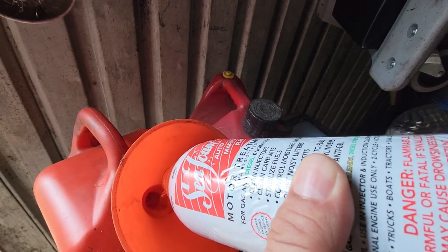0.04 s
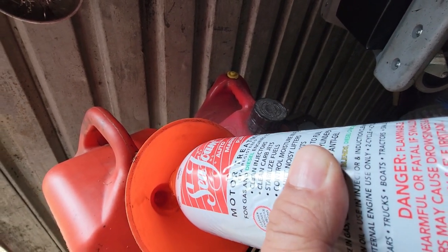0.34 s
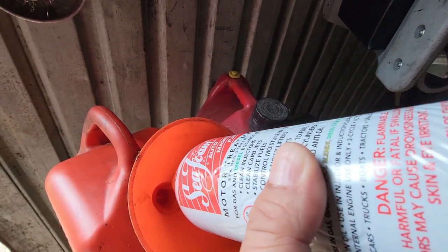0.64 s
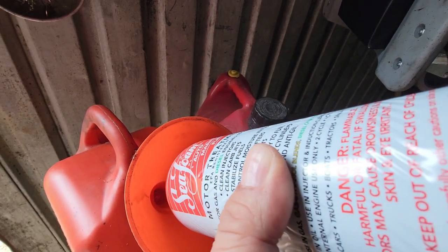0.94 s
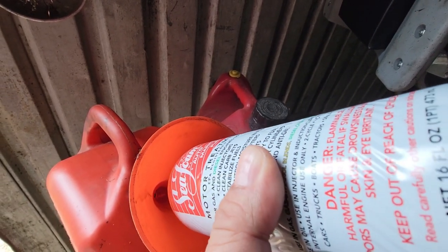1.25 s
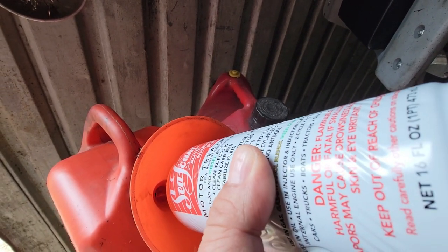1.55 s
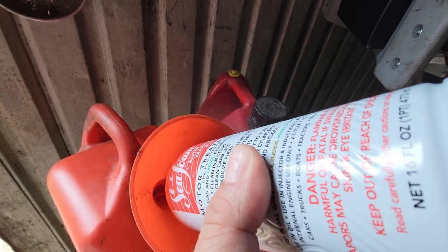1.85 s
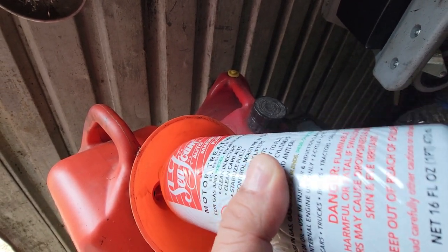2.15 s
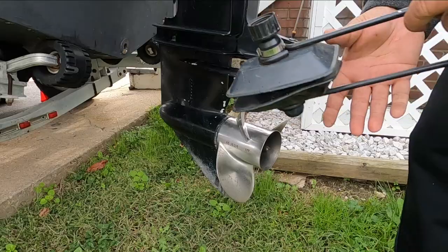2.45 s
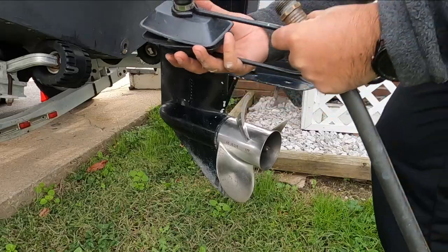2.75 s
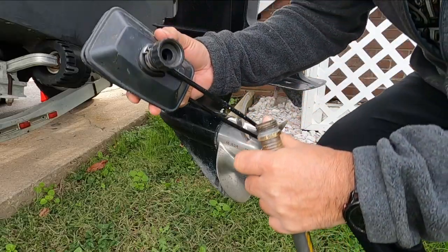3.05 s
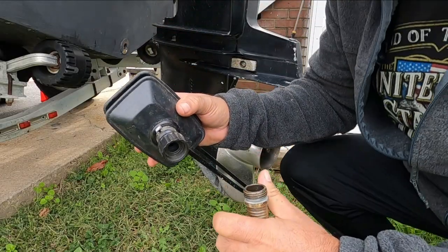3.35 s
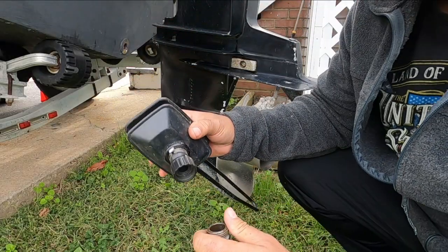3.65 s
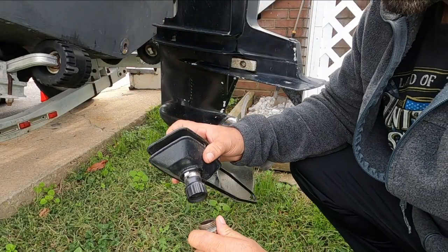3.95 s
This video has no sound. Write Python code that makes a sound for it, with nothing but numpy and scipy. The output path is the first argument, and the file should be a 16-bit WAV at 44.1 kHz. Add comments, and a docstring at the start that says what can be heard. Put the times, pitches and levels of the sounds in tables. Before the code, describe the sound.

Liquid trickles softly through a funnel into a hollow fuel can, dripping and gurgling over a low rumble until about 1.6 seconds. From 2 seconds a tin taps and scrapes the plastic funnel, with two small pings and hollow knocks. Sound cuts out near 2.5. From 2.7 louder outdoor wind rumbles and a sleeve swishes; from 3 to 3.8 a distant drone wavers, with cloth rubbing and faint wire scraping.

```python
"""In a shed, liquid trickles from a tin through a plastic funnel into a fuel can; bubbles and drips
ring the hollow can over a low rumble. The flow dies. The tin taps the funnel and scrapes along it,
its rim pings and the funnel knocks in the can's neck. The shed stops dead. After a short silence,
outdoors: wind rumbles, a sleeve swishes, something drones far off and a wire clamp scrapes faintly."""
import sys
import numpy as np
from scipy import signal
from scipy.fft import rfft, irfft
from scipy.io import wavfile
from scipy.ndimage import uniform_filter1d

SR = 44100
rng = np.random.default_rng(int(sys.argv[2]) if len(sys.argv) > 2 else 0)


def put_to_file(sound):
    """Save the sound as 16-bit audio at rate SR, in the file named by the first command-line argument."""
    columns = np.atleast_2d(sound).T  # one column per channel
    safe = np.clip(columns, -1, 1)
    whole_steps = np.round(safe * 32767)
    wavfile.write(sys.argv[1], SR, whole_steps.astype(np.int16))


N = 176400
TIME_S = np.arange(N) / SR
RING_S = TIME_S[:SR // 4]  # time axis of one short event


# stream flow: time_s, gain_db
FLOW = [(0, 4), (.14, 0), (.22, -9.5), (.44, -1), (.59, -14.5), (1.0, -6.5), (1.22, -10), (1.49, -8.5),
        (1.56, -20)]
# patter spectrum: freq_hz, gain_db
PATTER_SPECTRUM = [(300, -0.5), (2000, -4), (3200, -7), (4400, 3), (5600, -8), (7200, -0.5), (8400, -22.5),
                   (15000, -17)]
IMPACTS_PER_S, PATTER_DB = 350, -50.5

def trickle():
    """A thin, spurting stream patters into the can, louder where drips throw up spray."""
    patter = in_can(colour(clicks(IMPACTS_PER_S, spread_db=3), PATTER_SPECTRUM))
    flow = curve(FLOW) * undb(PATTER_DB) * uneven(per_s=35, depth_db=7)
    return patter * (flow + spray())


# air modes of the can: freq_hz, gain_db, t60_s
CAN_MODES = [(942, -8, 0.07), (2126, 2, 0.11), (2660, 1, 0.065), (3790, 1, 0.068), (4277, -4.5, .045),
             (6770, -11, 0.035)]
CAN_T60_S = 0.12

def in_can(x):
    """The hollow can adds dense wall echoes and air modes to the direct sound."""
    response = undb(7) * burst(CAN_T60_S) + unit(modes(CAN_MODES))
    response[:, 0] += undb(-6) * np.sqrt(len(RING_S))  # direct path
    return unit(signal.fftconvolve(x[None], response, axes=1)[:, :N])


# drips and bursting bubbles: start_s, pitch_hz, level_db, t60_s, splash_share
DRIPS = [(.044, 2122, -43, 0.14, 0.05), (.043, 6760, -53.5, 0.06, 0.3), (0.107, 4240, -56, 0.028, 0.66),
         (0.292, 4180, -45, 0.11, 0.7), (0.297, 2677, -47.5, 0.14, 0.21), (.360, 2014, -56, 0.05, 0.9),
         (0.389, 6980, -52.5, 0.05, 0.5), (0.489, 2584, -46, 0.055, 0.85), (.526, 4070, -56, 0.032, 0.6),
         (.648, 4396, -48, 0.087, 0.4), (.712, 3410, -51, 0.23, 0.95), (1.137, 4300, -54, 0.028, 0.7),
         (1.170, 7430, -54.5, 0.031, 0.06), (1.181, 4380, -47, 0.037, 0.2), (1.274, 2900, -48.5, .05, 0.7),
         (1.278, 3880, -49.5, 0.087, 0.07), (1.311, 2116, -49, 0.059, 0.6), (1.378, 4620, -51, 0.043, 0.5),
         (1.468, 7140, -55, 0.035, 0.3), (1.736, 6950, -57, 0.086, 0.7)]

def drips():
    """Drips and small bubbles ring high in the can."""
    out = np.zeros((2, N))
    for start_s, pitch_hz, level_db, t60_s, splash_share in DRIPS:
        add(out, start_s, bubble(pitch_hz, t60_s, splash_share), level_db)
    return out


def spray():
    """Patter gain from the brief spray of droplets after each drip."""
    gain = np.zeros((1, N))
    for start_s, _, level_db, _, _ in DRIPS:
        add(gain, start_s, decay(t60_s=.25)[None], level_db - 9)
    return gain


# large bubbles: start_s, level_db, pitch_hz
GURGLES = [(.026, -51.5, 920), (.312, -47.5, 907), (.531, -49, 725), (.609, -50, 908), (.688, -52.5, 1158),
           (.863, -49, 876), (.886, -53, 830), (.953, -58, 840), (.994, -52, 830), (1.216, -54, 753),
           (1.403, -55, 873)]

def gurgles():
    """Larger bubbles ring lower, in the funnel's neck."""
    out = np.zeros((2, N))
    for start_s, level_db, pitch_hz in GURGLES:
        add(out, start_s, bubble(pitch_hz, t60_s=0.053, splash_share=0.055), level_db)
    return out


def bubble(pitch_hz, t60_s, splash_share, rise=0.032, attack_s=0.0026, echo_db=4):
    """A tone that rises as it dies, with a splash around its pitch and echoes off the can's walls."""
    glide = 1 + rise * (np.minimum(RING_S / t60_s, 1) - .2)
    tone = np.sin(2 * np.pi * pitch_hz * np.cumsum(glide) / SR)
    band_hz = [pitch_hz / 1.09, min(pitch_hz * 1.067, 7900)]
    bandpass = signal.butter(2, band_hz, "band", fs=SR, output="sos")
    splash = unit(signal.sosfilt(bandpass, rng.standard_normal(len(RING_S))))
    envelope = decay(t60_s) * (1 - np.exp(-RING_S / attack_s))
    pop = (np.sqrt(1 - splash_share) * tone + np.sqrt(splash_share) * splash) * envelope
    walls = burst(CAN_T60_S) * undb(echo_db) / np.sqrt(len(RING_S))
    walls[:, 0] += 1  # direct path
    return signal.fftconvolve(pop[None], walls, axes=1)


# splash envelope: time_s, level_db
SPLASH_LEVEL = [(0, -61), (.4, -51), (.5, -63), (.62, -94.5)]
# splash resonance: freq_hz, width_hz, gain_db
SPLASH_PEAK = [(1770, 590, 0)]

def wall_splash():
    """At first the full stream splashes on the funnel's wall."""
    impacts = clicks(IMPACTS_PER_S, spread_db=3)
    return in_can(resonate(impacts, SPLASH_PEAK)) * curve(SPLASH_LEVEL)


# burble envelope: time_s, level_db
BURBLE_LEVEL = [(.25, -64.5), (.9, -57), (1.48, -61.5), (1.6, -77)]
# funnel neck resonances: freq_hz, width_hz, gain_db
NECK_PEAKS = [(754, 68, 1), (901, 58, 0.5), (1198, 33, 1)]

def burble(t60_s=.02):
    """The stream excites the hollow neck of the funnel."""
    impacts = clicks(IMPACTS_PER_S, spread_db=0.95)
    echoes = burst(t60_s) + burst(t60_s)[:1]
    churn = signal.fftconvolve(impacts[None], echoes, axes=1)[:, :N]
    return unit(resonate(churn, NECK_PEAKS)) * curve(BURBLE_LEVEL)


# fine spatters: start_s, level_db, centre_hz
SPATTERS = [(0.530, -61, 6240), (.660, -67, 7200), (.860, -61, 6000), (0.931, -57.5, 7760),
            (1.03, -59, 5000), (1.285, -60, 12000), (1.745, -62.5, 12600), (2.168, -61, 8000),
            (2.188, -60, 8670), (2.222, -56.5, 5550), (2.309, -59, 12500), (2.358, -52, 7400),
            (2.439, -62, 7100)]

def spatter(width_share=0.29):
    """Tiny droplets land in sharp, grainy bursts."""
    out = np.zeros((2, N))
    for start_s, level_db, centre_hz in SPATTERS:
        droplets = burst(t60_s=0.16) * np.abs(rng.standard_normal(len(RING_S)))
        add(out, start_s, resonate(droplets, [(centre_hz, centre_hz * width_share, 0)]), level_db)
    return out


# first touch of the tin: start_s, level_db
TAPS = [(1.985, -48.5)]
# sliding pressure: time_s, gain_db
PRESSURE = [(2.02, -22.5), (2.045, -9.5), (2.12, -9.5), (2.2, -2.5), (2.27, 1.5), (2.365, -1), (2.385, -20)]
# scrape resonances: freq_hz, width_hz, gain_db
SCRAPE_PEAKS = [(1888, 162, 8), (2400, 690, -4), (3450, 210, -9.5), (4300, 470, -10.5), (7150, 790, -22.5)]
# broad rasp of the scrape: freq_hz, gain_db
RASP_SPECTRUM = [(200, 15.5), (600, 4.5), (4000, -21.5), (15000, -47)]
SCRAPE_DB, RASP_GAIN_DB = -44.5, -8.5

def tin_scrape():
    """The tin taps the funnel, then sticks and slips along it."""
    common, left, right = (clicks(per_s=3000, spread_db=1) for _ in range(3))
    slips = common + .5 * np.array([left, right])
    scrape = unit(resonate(slips, SCRAPE_PEAKS)) + undb(RASP_GAIN_DB) * unit(colour(slips, RASP_SPECTRUM))
    grip = curve(PRESSURE) * uneven(per_s=35, depth_db=4)
    touching = TIME_S > TAPS[0][0]
    out = scrape * grip * touching * undb(SCRAPE_DB)
    for start_s, level_db in TAPS:
        tap = colour(burst(t60_s=0.054), [(300, 7), (2900, 6), (3600, -35)])
        add(out, start_s, tap, level_db)
    return out


# rim pings: start_s, pitch_hz, level_db, t60_s
PINGS = [(2.309, 4470, -42.5, 0.08), (2.384, 3824, -45, 0.14)]

def rim_pings():
    """The tin's rim rings in one mode, with a shorter noise at the same pitch."""
    out = np.zeros((2, N))
    for start_s, pitch_hz, level_db, t60_s in PINGS:
        ring = unit(modes([(pitch_hz, 0, t60_s)])[:1])
        strike = unit(resonate(burst(t60_s / 2), [(pitch_hz, pitch_hz / 10, 0)]))
        add(out, start_s, ring + strike, level_db)
    return out


# funnel knocks: start_s, level_db
KNOCKS = [(2.224, -47), (2.234, -39.5), (2.392, -34)]
# plastic funnel modes: freq_hz, gain_db, t60_s
FUNNEL_MODES = [(178, -13, 0.2), (343, 0.5, 0.078), (510, -7, 0.041), (736, -3.5, 0.032),
                (1031, -11.5, 0.069)]

def funnel_knocks(crack_db=-9.5, push_s=.008):
    """The funnel hits the can's neck: low modes and a noisy crack."""
    out = np.zeros((2, N))
    attack = 1 - decay(push_s)
    for start_s, level_db in KNOCKS:
        crack = colour(burst(t60_s=0.24), [(300, -5), (1000, 3), (1600, -11), (15000, -32)])
        body = unit(modes(FUNNEL_MODES)[:1] + .5 * modes(FUNNEL_MODES))
        add(out, start_s, (body + undb(crack_db) * unit(crack)) * attack, level_db)
    return out


# swish envelope: time_s, level_db
SWISH_LEVEL = [(2.66, -44), (2.81, -34.5), (2.835, -35.5), (2.86, -48), (2.93, -60), (3.05, -66)]
# swish spectrum: freq_hz, gain_db
SWISH_SPECTRUM = [(400, -20), (1100, 2.5), (2300, 6), (3200, -1.5), (7000, -13.5), (8500, -22),
                  (14500, -41)]
# rub envelope: time_s, level_db
RUB_LEVEL = [(2.8, -50), (3.3, -54.5), (3.42, -51), (3.65, -50.5), (3.8, -62.5)]
# rub spectrum: freq_hz, gain_db
RUB_SPECTRUM = [(1200, 15), (2500, 0.5), (5500, 0), (8500, -14), (10500, -14.5), (15000, -41)]

def sleeve():
    """Cloth swishes once, then rubs softly."""
    return noise(SWISH_SPECTRUM) * curve(SWISH_LEVEL) + noise(RUB_SPECTRUM) * curve(RUB_LEVEL)


# clamp envelope: time_s, level_db
CLAMP_LEVEL = [(3.25, -76), (3.42, -62.5), (3.66, -69), (3.72, -85)]
# clamp resonance: freq_hz, width_hz, gain_db
CLAMP_PEAK = [(2520, 100, 0)]

def wire_clamp():
    """A handled wire clamp scrapes: small slips excite one thin resonance."""
    slips = clicks(per_s=350, spread_db=3.6)
    return unit(resonate(slips, CLAMP_PEAK)) * curve(CLAMP_LEVEL)


# drone envelope: time_s, level_db
DRONE_LEVEL = [(3.04, -63), (3.14, -40.5), (3.24, -47), (3.3, -56), (3.43, -40), (3.5, -51.5),
               (3.57, -43.5), (3.76, -47), (3.84, -54)]
# drone resonances: freq_hz, width_hz, gain_db
DRONE_PEAKS = [(515, 63, -3.5), (757, 69, -8), (1000, 54, -16.5), (1350, 110, -21)]

def far_drone():
    """Narrow bands of noise swell and sink in the distance."""
    return unit(resonate(rng.standard_normal(N), DRONE_PEAKS)) * curve(DRONE_LEVEL)


# wind envelope: time_s, level_db
WIND_LEVEL = [(2.66, -30.5), (3.35, -31.5), (3.55, -35.5), (4, -35)]
# wind spectrum: freq_hz, gain_db
WIND_SPECTRUM = [(27, -7), (36, -1), (65, -8), (110, -5.5), (150, -14.5), (220, -17.5), (280, -23.5),
                 (1000, -36.5), (3000, -73)]
# low wind resonances: freq_hz, width_hz, gain_db
THRUM_PEAKS = [(96.2, 9, -2), (117.2, 8.1, -5)]

def wind(thrum_db=-2.5):
    """Wind rumbles and thrums, easing near the end."""
    rumble = noise(WIND_SPECTRUM)
    thrum = unit(resonate(rng.standard_normal(N), THRUM_PEAKS))
    return (rumble + undb(thrum_db) * thrum) * curve(WIND_LEVEL)


# outdoor air: freq_hz, gain_db
YARD_SPECTRUM = [(300, -1.5), (1100, 6), (2300, -17.5), (7000, -70), (8500, -44), (14000, -59)]

def yard_air(level_db=-51):
    """Steady midrange hush outdoors."""
    return noise(YARD_SPECTRUM) * undb(level_db)


# shed rumble: freq_hz, gain_db
RUMBLE_SPECTRUM = [(25, -18), (55, 1), (78, 0), (110, -9), (300, -21), (700, -37.5)]
# shed air: freq_hz, gain_db
AIR_SPECTRUM = [(300, 0), (800, 4.5), (1400, -1), (4000, -10), (7000, -15), (8500, -33.5), (15000, -32.5)]
RUMBLE_DB, AIR_DB, RIGHT_LAG_S = -47.5, -63.5, 0.00049

def shed_air():
    """Low rumble that arrives slightly later on the right, and faint, wide air."""
    low = noise(RUMBLE_SPECTRUM)
    delayed = np.roll(low, int(RIGHT_LAG_S * SR))
    rumble = np.array([low * undb(RUMBLE_DB - .5), delayed * undb(RUMBLE_DB + .5)])
    mid = noise(AIR_SPECTRUM)
    side = undb(4.5) * noise(AIR_SPECTRUM)
    return rumble + np.array([mid + side, mid - side]) * undb(AIR_DB)


def undb(db):
    return 10 ** (np.asarray(db) / 20)


def unit(x):
    """Scale to unit RMS."""
    return x / np.sqrt(np.mean(x ** 2) + 1e-20)


def curve(points):
    """Gain along (time_s, gain_db) points."""
    return undb(np.interp(TIME_S, *np.array(points).T))


def colour(x, points):
    """Filter by (freq_hz, gain_db) points, rolling off beyond both ends."""
    hz, db = np.array(points).T
    f = np.maximum(np.fft.rfftfreq(x.shape[-1], 1 / SR), 1)
    skirts = 1 / np.sqrt((1 + (.6 * hz[0] / f) ** 4) * (1 + (f / hz[-1] / 2) ** 4))
    gain = undb(np.interp(np.log(f), np.log(hz), db))
    return irfft(rfft(x) * skirts * gain, x.shape[-1])


def resonate(x, peaks):
    """Parallel steep resonances (freq_hz, width_hz, gain_db)."""
    f = np.maximum(np.fft.rfftfreq(x.shape[-1], 1 / SR), 1)
    gain = sum(undb(db) / (1 + ((f - hz * hz / f) / width_hz) ** 2) for hz, width_hz, db in peaks)
    return irfft(rfft(x) * gain, x.shape[-1])


def noise(spectrum):
    return unit(colour(rng.standard_normal(N), spectrum))


def decay(t60_s):
    return np.exp(-np.log(1000) * RING_S / t60_s)


def burst(t60_s):
    """Decaying stereo noise."""
    return unit(rng.standard_normal((2, len(RING_S))) * decay(t60_s))


def modes(table):
    """Decaying sines, random phase per channel."""
    return sum(undb(db) * decay(t60_s) * np.sin(2 * np.pi * (hz * RING_S + rng.random((2, 1))))
               for hz, db, t60_s in table)


def clicks(per_s, spread_db):
    """Random impacts, mostly small, a few large."""
    impulses = (rng.random(N) < per_s / SR) * rng.choice([-1, 1], N)
    return impulses * undb(spread_db * np.minimum(rng.exponential(size=N), 4))


def uneven(per_s, depth_db):
    """Gain of an unsteady flow or grip: random levels, held and smoothed."""
    hold = int(SR / per_s)
    steps = (2 * rng.random(N) - 1)[np.arange(N) // hold]
    return unit(undb(depth_db * uniform_filter1d(steps, hold // 2)))


def add(out, start_s, sound, level_db):
    """Mix in a short sound with its loudest 10 ms at level_db."""
    power = uniform_filter1d(np.mean(sound ** 2, axis=0), SR // 100)
    i = int(start_s * SR)
    out[:, i:i + sound.shape[1]] += sound[:, :N - i] * undb(level_db) / np.sqrt(power.max())


SHED_END_S, SHED_FADE_S, YARD_START_S, YARD_FULL_S = 2.467, 0.0093, 2.6485, 2.743

def scene():
    """The shed, with the pouring right of centre, stops dead; the yard fades in, centred."""
    liquid = trickle() + wall_splash() + burble() + spatter() + drips() + gurgles()
    handling = tin_scrape() + rim_pings() + funnel_knocks()
    pan = undb([[-1.5], [1.5]])
    indoors = (liquid + handling) * pan + shed_air()
    outdoors = wind() + far_drone() + sleeve() + wire_clamp() + yard_air()
    fade_out = np.clip((SHED_END_S - TIME_S) / SHED_FADE_S, 0, 1)
    fade_in = np.clip((TIME_S - YARD_START_S) / (YARD_FULL_S - YARD_START_S), 0, 1) ** 2.77
    return indoors * fade_out + outdoors * fade_in


def record(dry):
    """Steep low-pass at 15850 Hz."""
    return signal.sosfilt(signal.ellip(10, .2, 80, 15850, fs=SR, output="sos"), dry)


dry = scene()
out = record(dry)
put_to_file(out)
```